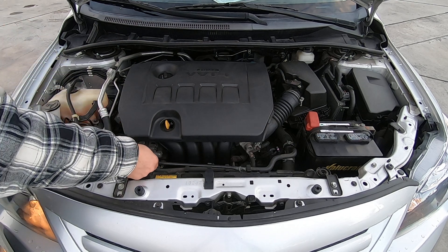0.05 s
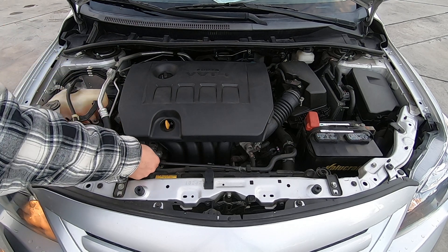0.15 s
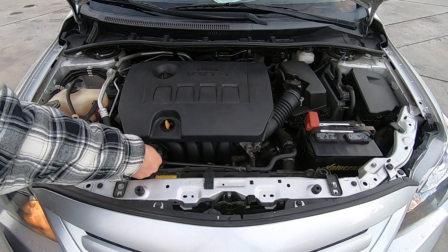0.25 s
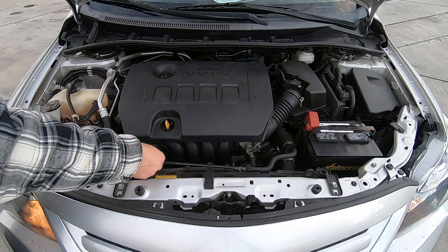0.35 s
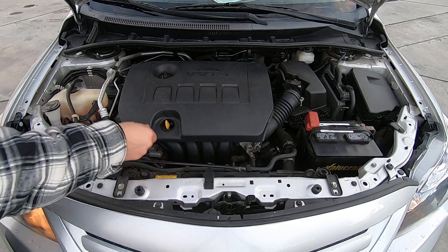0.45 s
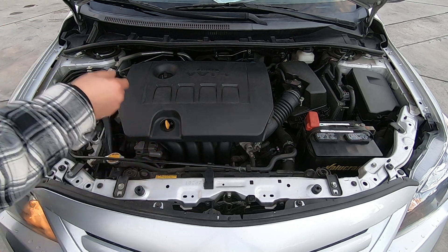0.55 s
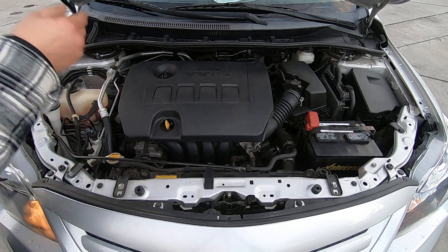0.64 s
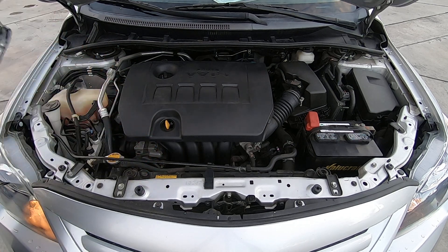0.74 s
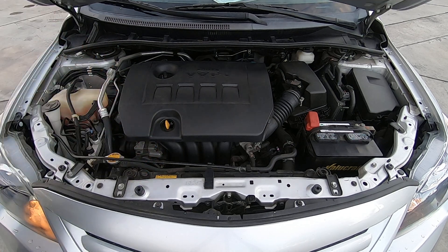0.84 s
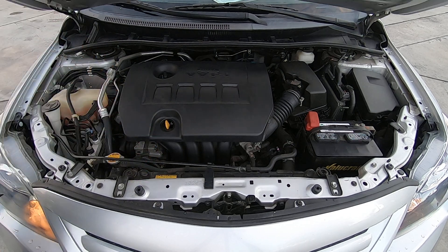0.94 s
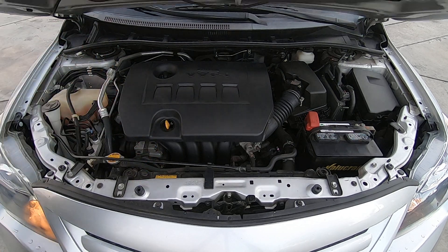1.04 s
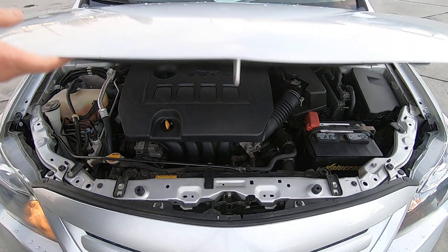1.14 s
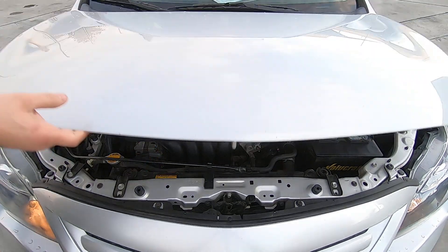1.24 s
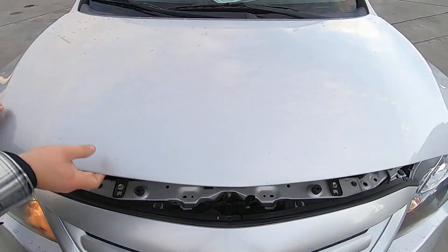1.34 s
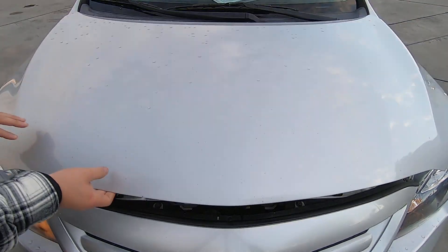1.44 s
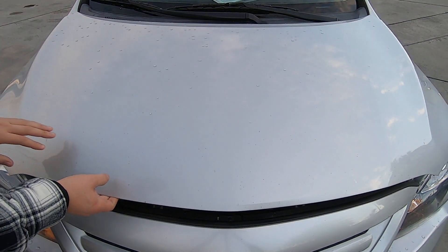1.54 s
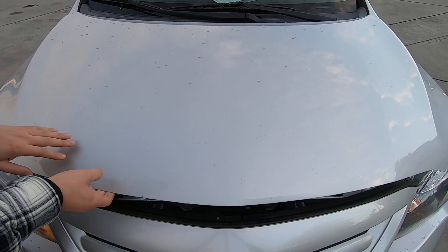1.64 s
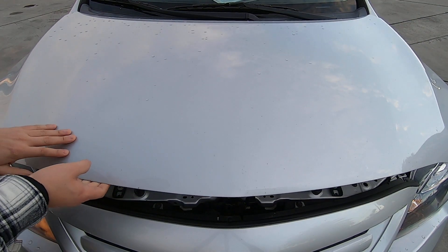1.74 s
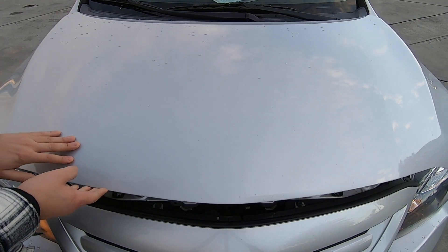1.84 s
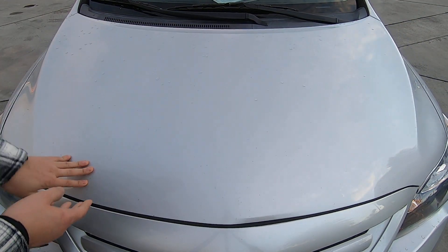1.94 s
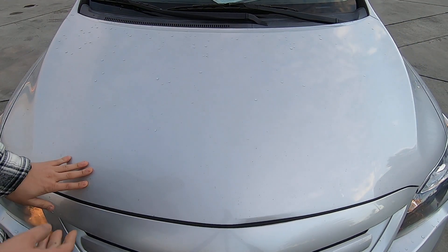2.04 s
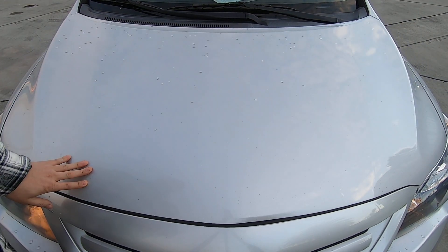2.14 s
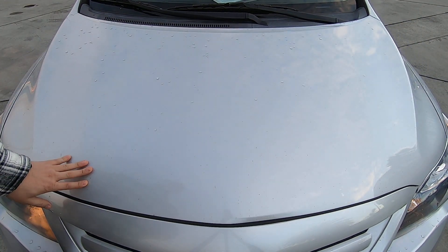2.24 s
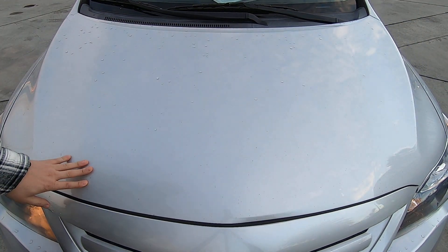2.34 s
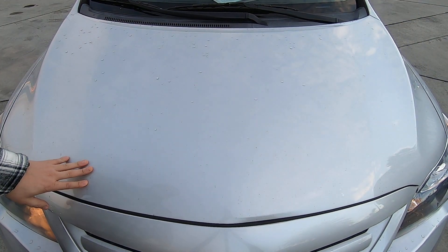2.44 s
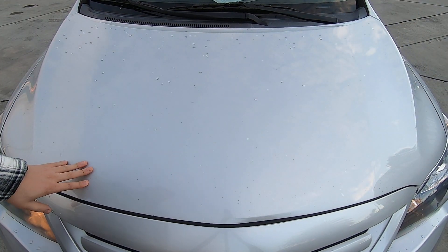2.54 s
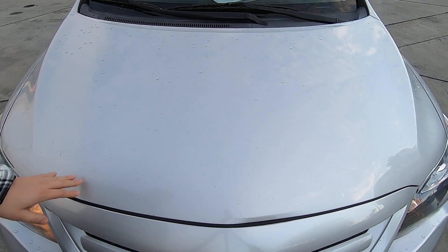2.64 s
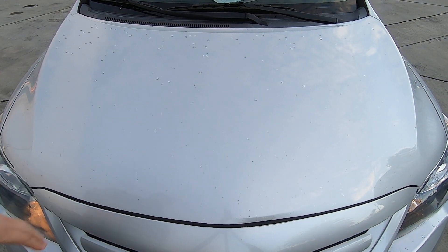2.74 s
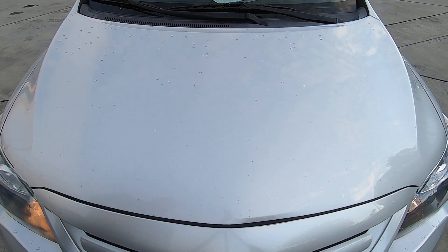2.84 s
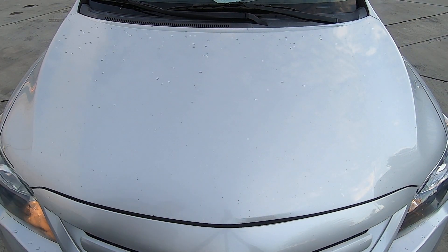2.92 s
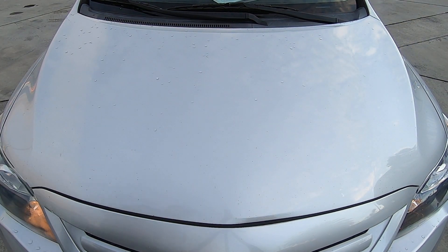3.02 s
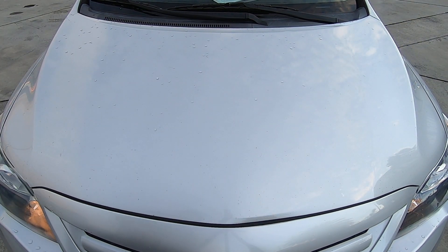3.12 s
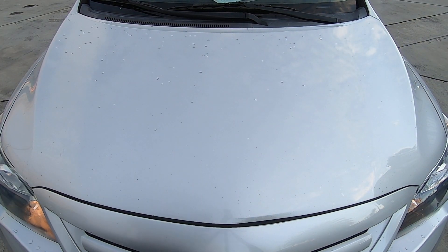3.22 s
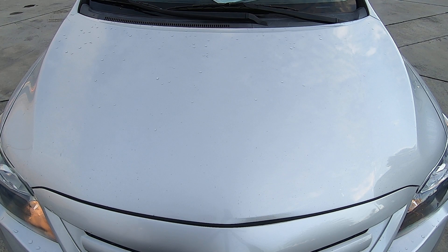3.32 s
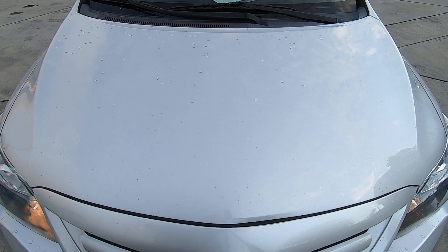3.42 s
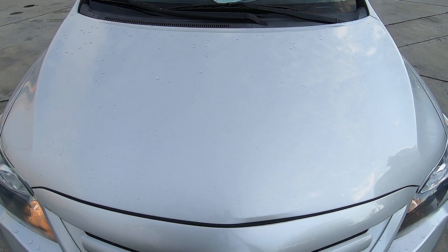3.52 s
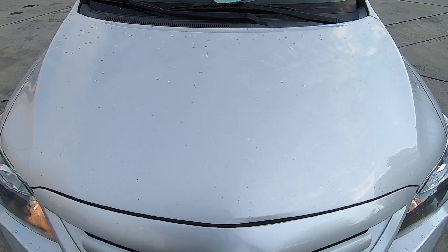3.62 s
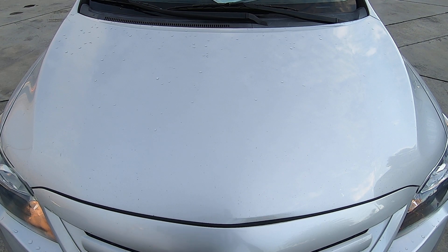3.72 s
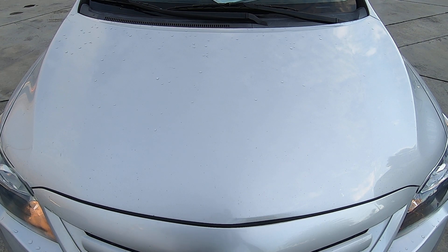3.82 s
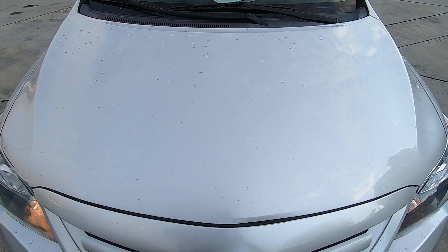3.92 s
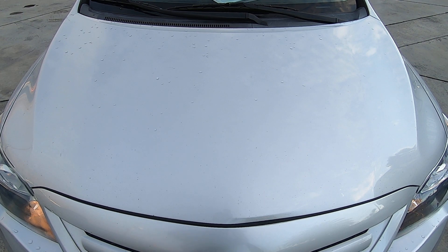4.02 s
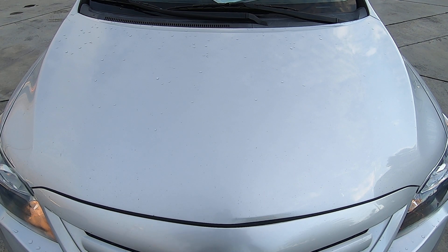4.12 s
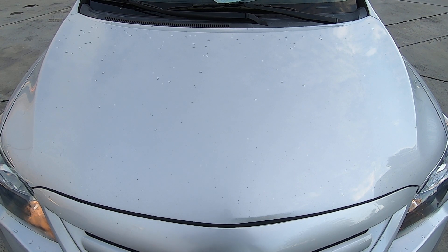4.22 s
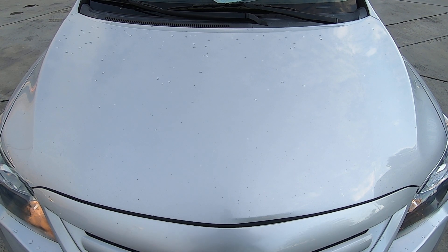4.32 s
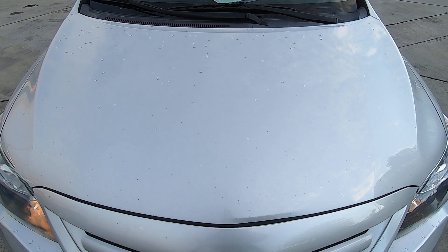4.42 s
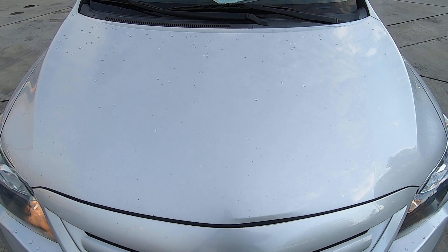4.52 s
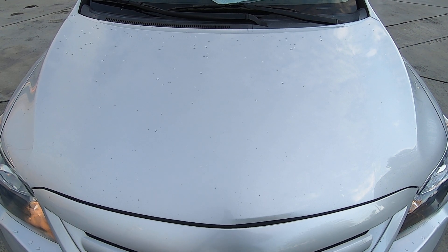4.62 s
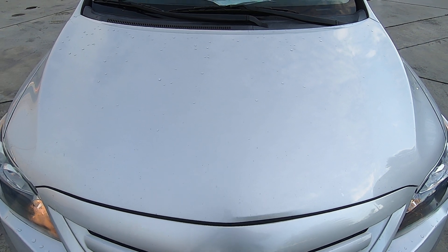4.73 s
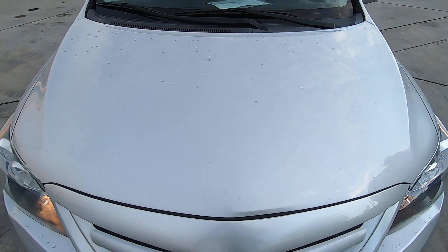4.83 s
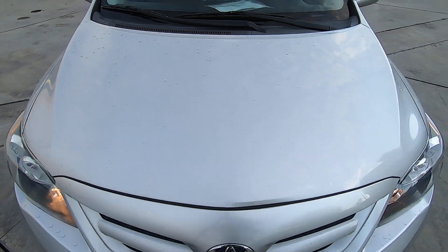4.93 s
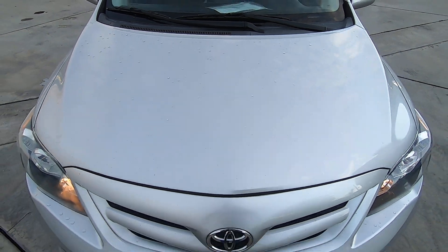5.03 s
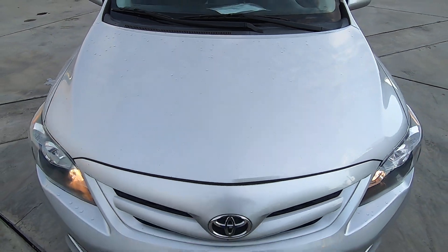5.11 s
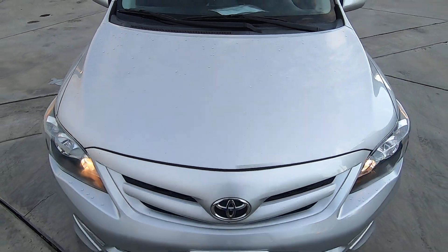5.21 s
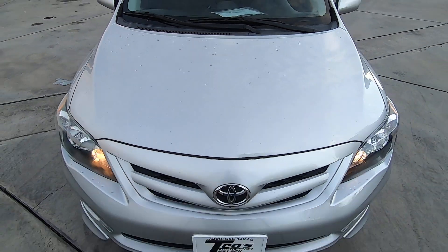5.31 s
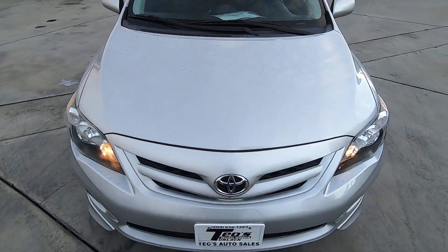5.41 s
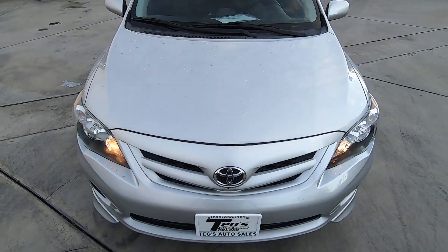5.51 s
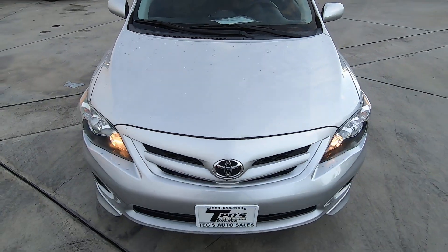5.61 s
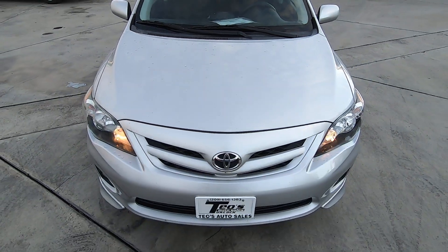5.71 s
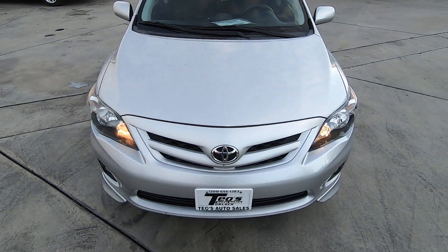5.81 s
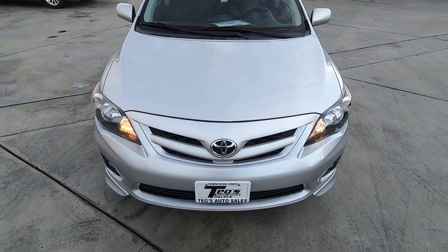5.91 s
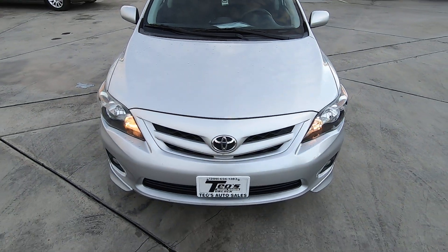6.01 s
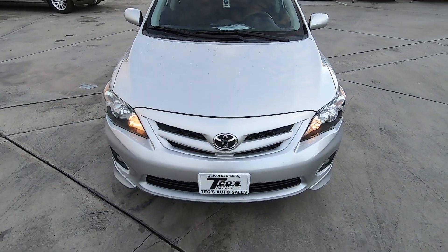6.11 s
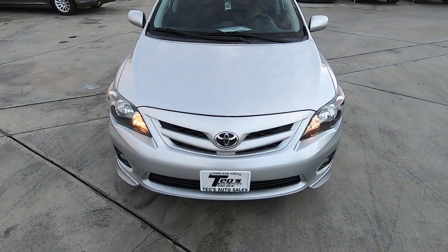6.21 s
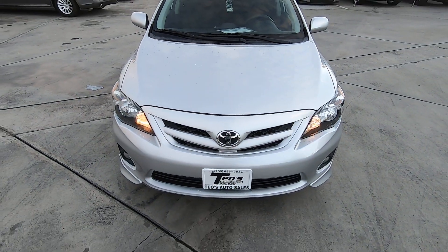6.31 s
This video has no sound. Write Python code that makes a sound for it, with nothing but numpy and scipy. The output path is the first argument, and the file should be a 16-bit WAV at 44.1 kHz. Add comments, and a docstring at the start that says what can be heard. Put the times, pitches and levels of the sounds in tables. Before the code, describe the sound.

A four-cylinder car idles outdoors, the microphone close above the open engine bay: low throbbing hum, rumble, belt whirr, and bright hiss with rapid uneven injector ticks. Almost immediately, at 0.03 seconds, a prop rod snaps into its clip with a hard clack and short metallic ring. Around 1.1 a soft, low bump comes from the hinges. From 1.2 to 1.5 the lowering hood cuts the hiss and ticking. At 2.03 the hood slams: a dense crunch of latch and stops, deep thumps and a booming steel panel, fading within about half a second with a faint spring rattle. The idle is then ducked and muffled, gradually recovering. Faint ticks and light knocks occur near 3.7, 3.8 and 4.8. From 4.75 the microphone backs away with a brief low air buffet; the rumble swells, some hiss returns through the grille, a small knock sounds at 5.3, and the image narrows toward mono until the end, about 6.4.

```python
"""Outdoors, a four-cylinder car idles with its hood up; its firing hum is a sum of sines, its other sounds noise.
The prop rod snaps into its clip: noise bursts and damped modes. The hood is lowered over the ticking injectors
and slammed: latch and stops clash in dense noise, and the modes of the steel panel boom.
The gain ducks and creeps back; later the microphone retreats to the front of the muffled car."""
import sys
import numpy as np
from scipy import signal
from scipy.fft import rfft, irfft, next_fast_len
from scipy.io import wavfile
from scipy.ndimage import uniform_filter1d, minimum_filter1d

SR = 44100
rng = np.random.default_rng(int(sys.argv[2]) if len(sys.argv) > 2 else 0)


def master(y):
    """Save y as 16-bit WAV."""
    cut = np.clip(np.atleast_2d(y).T, -1, 1)
    pcm = np.round(cut * 32767)  # scale
    wavfile.write(sys.argv[1], SR, pcm.astype(np.int16))


N = 280430
TIME = np.arange(N) / SR  # seconds

# Contacts of the falling hood. Each row: start in seconds, clash level in dB, panel level in dB,
# low-pass cutoff of the panel in Hz, rise time in seconds.
SLAM_CONTACTS = [(2.031, -20, -24, 600, 0.00091), (2.0356, -20.5, -12, 700, .0009),
                 (2.044, -14.5, -17, 400, 0.00092), (2.051, -13, -11.5, 700, .0008),
                 (2.0645, -14.5, -9.5, 1100, 0.0014), (2.074, -31, -14.5, 1500, 0.0018),
                 (2.083, -42, -8.5, 2500, 0.0033), (2.094, -43, -10.5, 1500, 0.0014),
                 (2.112, -36, -14, 2000, 0.0034), (2.135, -40, -20, 1500, .003),
                 (2.16, -35, -22, 1000, 0.0067), (2.181, -39, -19.5, 400, 0.0027)]
# Spectra of the dense ring of the sheet steel, of the latch clash and of the bright crack.
# Each row: frequency in Hz, relative density in dB per Hz.
PANEL_SPECTRUM = [(26, -42), (45, -18), (64, -13), (98, -13), (161, -8), (254, -8), (333, -12.5),
                  (490, -10.5), (600, -12), (1000, -22.5), (1670, -31.5), (2300, -40), (2500, -30),
                  (3250, -53), (5500, -120)]
CLASH_SPECTRUM = [(410, -30), (700, -5), (934, -5), (1400, -8.5), (1750, -7.5), (2250, -7), (2660, -9),
                  (3240, -9), (4300, -14), (5260, -15), (5760, -13), (10300, -23.5), (14000, -47),
                  (16000, -45)]
CRACK_SPECTRUM = [(900, -15), (2000, 6.5), (4300, 2.5), (5600, -10), (7000, -7), (10000, -13), (12000, -24),
                  (16000, -28)]
# Decay of the panel and of the clash. Each row: frequency in Hz, time to fall by 60 dB in seconds.
PANEL_DECAY = [(60, 0.69), (200, 0.58), (500, 0.24), (1000, 0.29), (2500, 0.53)]
CLASH_DECAY = [(800, 0.33), (2500, 0.18), (6000, 0.074), (14000, 0.11)]
# Modes of the hood panel, the latch, the safety catch and the rattling latch spring.
# Each row: frequency in Hz, relative level in dB, time to fall by 60 dB in seconds.
PANEL_MODES = [(70.5, 0, .6), (101.3, -9.5, 0.42), (130, -8, .45), (165, 0.5, .6), (202, -2.5, .4),
               (243.6, -0.5, 0.45), (273, -1, 0.44), (306, -7, 0.28), (359, -9, 0.57), (384.6, -7, 0.33),
               (450, -7, 0.33), (485, -4.5, .39), (501, -4.5, 0.26), (637, -9, 0.22), (660, -8.5, .22),
               (742, -10.5, .33), (987, -20, 0.33)]
LATCH_MODES = [(1450, -6, .18), (1579, 0, 0.12), (1760, 6, 0.14), (1912, 1.5, 0.12), (2030, -2, 0.11),
               (2130, -1.5, .18), (2346, -1.5, 0.15), (2498, -5, 0.089), (2880, -3, 0.19), (3190, -2, .18),
               (3310, -3, .14), (3600, -3, 0.14), (3590, 0, .12), (4822, -2, .11), (5688, -1, 0.068),
               (5952, -6, .1), (6330, 0, .08), (6444, -7, .07)]
CATCH_MODES = [(2000, 3.5, .09), (2250, -2, 0.1), (3530, 0, .05), (3730, -2, 0.07), (4120, -15, .04),
               (6160, -11, .03)]
SPRING_MODES = [(2500, -4, .05), (2914, 5, .06), (3180, 0, .06), (3400, -2, .05), (3660, -7, .04),
                (5690, -16, .03)]
# Dull thumps of rubber stops, seal and air squeezed from the bay.
# Each row: start in seconds, frequency in Hz, level in dB, time to fall by 60 dB in seconds.
THUMPS = [(2.033, 240, -5.5, 0.18), (2.044, 125, -1, .09), (2.056, 70, 4, .14), (2.0926, 227, -3, .1),
          (2.177, 158, -9, 0.15)]
# The prop rod meets its clip, seats and bounces. Each row: start in seconds, crack level in dB,
# ring level in dB, low-pass cutoff of the ring in Hz, rise time in seconds.
ROD_HITS = [(0.0292, -14.5, -24.5, 16000, 0.00073), (0.0326, -22, -17.5, 9000, .002),
            (0.0403, -31, -26.5, 6000, .0012), (.0535, -39, -24.5, 1300, .0016),
            (.067, -41, -29, 1300, .0026)]
# Spectrum of the rod's dense ring. Each row: frequency in Hz, relative density in dB per Hz.
ROD_SPECTRUM = [(70, -16), (150, -3), (280, -4), (433, -17), (580, -15), (851, -5), (1020, -19), (1170, -7),
                (1500, -23.5), (1900, -12.5), (2380, -19), (2800, -22), (3900, -21.5), (5480, -27),
                (8150, -29), (14200, -54), (16000, -74)]
# Decay of the rod. Each row: frequency in Hz, time to fall by 60 dB in seconds.
ROD_DECAY = [(200, 0.5), (700, 0.2), (2000, 0.12), (5000, 0.067), (12000, 0.096)]
BRACKET_MODES = [(181, -7, 0.35), (211, 2, 0.31), (251, -1.5, 0.35), (270, 4.5, 0.17), (326, -8, 0.24),
                 (410, -7, 0.22), (480, -7, 0.28), (576, 2.5, .14), (752, -4.5, 0.24), (838, 2, 0.11),
                 (1174, -9, .16), (1796, -13, .2), (2342, -7.5, 0.14), (2450, -11, .1), (3730, -12, 0.099),
                 (4048, -12, .12), (4360, -25, .08)]
# The hood bumps on its hinges; then faint knocks and ticks. Each row: start in seconds, level in dB,
# centre frequency in Hz, time to fall by 60 dB in seconds, rise time in seconds.
KNOCKS = [(1.126, -27, 205, .3, 0.011), (1.126, -26, 350, 0.29, .016), (1.127, -28, 510, .24, 0.011),
          (3.668, -40, 3340, 0.045, .005), (3.668, -48.5, 4100, .05, .005), (3.669, -61, 6500, .06, .007),
          (3.839, -21.5, 736, 0.024, 0.0015), (4.817, -26, 1260, 0.034, 0.0017),
          (5.2915, -23, 720, 0.049, 0.0017)]
# Idle levels with the hood up, ajar and shut, then the gains in front of the car and close over its nose.
# Each row: rumble, whirr and hiss in dB.
UP_DB = (-27.5, -33.5, -45.5)
AJAR_DB = (-29, -34.5, -50)
SHUT_DB = (-30, -34.5, -52.5)
FRONT_GAIN_DB = (5, 3, 5)
NOSE_GAIN_DB = (2.2, 2, 0.1)
# Irregular, mostly brief level fluctuations of the rumbling noise.
# Each row: centre in seconds, peak change in dB, Gaussian width in seconds.
RUMBLE_FLUCTUATIONS = [(.47, 4, .05), (1.575, 3, 0.022), (2.57, -4, 0.065), (3.01, -4, 0.025),
                       (3.63, -0.5, 0.029), (3.99, 5, 0.036), (4.37, 5.5, 0.03), (5.7, 2, 0.35),
                       (6.11, 4.5, 0.036)]
# Harmonics of the steady hum. Each row: multiple of the firing rate, amplitude in dB.
HUM_HARMONICS = [(1, -38.5), (2, -46.5), (3, -40.5), (4, -45), (5, -43.5), (9, -43.5)]
# Ticks within one firing. Each row: share of the firing cycle, strength as a factor.
TICKS = [(-.03, 2.17), (.38, 0.38), (.59, 0.56), (.85, 0.4)]
# Tick strength of the cylinders in turn. Each entry: level in dB.
CYLINDER_DB = [1, -1, 2, -0.5]
# Spectra of the rumble, of the whirr (hood up, round the shut body, through the grille) and of the hiss
# (open bay, through the shut hood, through gap or grille).
# Each row: frequency in Hz, relative density in dB per Hz.
RUMBLE_SPECTRUM = [(12, -28.5), (20, -5.5), (102, 0.5), (161, -7), (211, -7.5), (252, -14.5), (330, -19.5),
                   (430, -36), (730, -120)]
WHIRR_UP = [(150, -22), (250, -3), (365, -2.5), (405, -6), (508, -2.5), (554, -5), (764, -3), (1120, -8),
            (1350, -13.5), (1540, -11), (2400, -26), (3120, -43), (5280, -120)]
WHIRR_SHUT = [(150, -28), (250, -2), (291, -6), (342, 1.5), (397, -5), (528, 1), (1090, -4.5),
              (1700, -12.5), (2400, -22.5), (3120, -52), (5280, -120)]
WHIRR_GRILLE = [(150, -29), (250, -1.5), (308, -6), (437, -5), (499, -6), (597, -2), (864, -4.5),
                (1200, -11.5), (1430, -12), (2100, -22), (2400, -27.5), (3120, -42), (5280, -120)]
HISS_BAY = [(1180, -28), (2000, 1.5), (2220, -3.5), (2670, 0), (4050, -5.5), (4730, -6.5), (6090, -18),
            (7700, -17), (9920, -23), (11500, -32), (14800, -36), (16000, -43)]
HISS_SHUT = [(1180, -20), (2000, -3), (2490, -4), (3170, -5.5), (3840, -13), (5390, -19.5), (6640, -24),
             (9090, -26.5), (11000, -40), (12400, -45.5), (16000, -69)]
HISS_GRILLE = [(1180, -24), (2000, -4.5), (2160, -2), (3090, -0.5), (4490, -12), (5730, -25.5),
               (6530, -25.5), (7640, -24), (9660, -29.5), (11500, -45), (13700, -47), (16000, -74)]
# Spectrum of air buffeting the microphone ports. Each row: frequency in Hz, relative density in dB per Hz.
BUFFET_SPECTRUM = [(25, 3), (90, 0), (190, -5), (300, -8), (700, -24)]
# Source width, before the image as a whole opens and narrows. Each row: frequency in Hz, side minus mid in dB.
WIDTH_NEAR = [(60, -37), (110, -32), (200, -36), (380, -18), (700, -3), (1290, 2.5), (2380, 0.5),
              (4400, -5), (8120, 11.5), (15000, 4)]
WIDTH_FAR = [(60, -22), (110, -32.5), (200, -25.5), (380, -20.5), (700, -7), (1290, -2), (2380, -5.5),
             (4400, -6), (8120, -1.5), (15000, -7)]
WIDTH_SLAM = [(60, -42), (110, -40), (200, -36), (380, -16), (700, -9), (1290, -5), (2380, -8), (4400, -7),
              (8120, 4), (15000, 1)]

# the hood is lowered until it stands ajar; from the first contact of the slam it seals
LOWER_AT_S, LOWER_TAKES_S, SEAL_TAKES_S = 1.23, 0.27, 0.15
# the microphone steps back, passes close over the nose of the car and faces the grille
STEP_BACK_AT_S, STEP_BACK_TAKES_S, GRILLE_IN_VIEW_S = 4.75, 0.9, 0.4
NOSE_AT_S, NOSE_WIDTH_S = 4.86, 0.39
# shares of the hiss (0-1): straight from the bay, then through the gap under the hood or the grille
AJAR_LEAK, SHUT_LEAK = 0.1, 0.014
AJAR_GAP, GRILLE_SHARE = 0.5, 0.92
FIRING_HZ, TICKS_DB = 24.86, 1.5
CATCH_AT_S, CATCH_DB, CRACK_T60_S = 2.032, -20, 0.025
RATTLE_AT_S, RATTLE_DB, RATTLE_T60_S, RATTLE_TAPS_PER_S = 2.11, -36, 0.47, 130
BOOM_AT_S, BOOM_DB, BOOM_RISE_S, BOOM_DRIVEN_S = 2.031, -8.5, 0.041, 0.082
BRACKET_DB = 2  # against the rod's ring
BUFFET_AT_S, BUFFET_DB = 4.76, -41
BUFFET_ATTACK_S, BUFFET_HOLD_S, BUFFET_RELEASE_S = 0.04, 0.2, 0.16
# gain of the side signal as the stereo image opens, then narrows towards mono
NARROW_DB, WIDE_DB, WIDEN_S = -52, 3.5, 0.86
NARROW_AT_S, NARROW_DB_PER_S = 4.91, 50.5
CUTOFF_HZ = 15750


def hood():
    """Impact excitation: the catch trips, contacts clash and shake the panel, and stops and trapped air thump."""
    out = np.zeros((2, N))
    add(out, CATCH_AT_S, from_db(CATCH_DB) * mode_ring(CATCH_MODES, spread_db=2.0))
    for start_s, clash_db, panel_db, bright_hz, rise_s in SLAM_CONTACTS:
        clash = from_db(clash_db) * latch_clash()
        panel_ring = dense_ring(PANEL_SPECTRUM, PANEL_DECAY, WIDTH_SLAM)
        panel = from_db(panel_db) * softened(panel_ring, bright_hz)
        add(out, start_s, rising(rise_s) * (clash + panel))
    add(out, BOOM_AT_S, panel_boom())
    for start_s, hz, db, t60 in THUMPS:
        add(out, start_s, from_db(db) * np.sin(2 * np.pi * hz * TIME[:SR]) * dying(t60))
    add(out, RATTLE_AT_S, spring_rattle())
    return out


def latch_clash():
    """Broadband impact: chattering dense noise, latch modes and a crack, with a faint lingering tail."""
    dense = dense_ring(CLASH_SPECTRUM, CLASH_DECAY, WIDTH_SLAM)
    crunch = from_db(-1.5) * dense * chatter(per_s=500, depth_db=8)
    # the clash lingers in the body and over the concrete
    linger = from_db(-18) * noise(CLASH_SPECTRUM, WIDTH_SLAM, size=SR) * dying(0.4)
    latch = from_db(-4.5) * mode_ring(LATCH_MODES, spread_db=2)
    return crunch + linger + latch + crack()


def panel_boom():
    """Driven resonance: the run of contacts sustains the panel modes, which then decay freely."""
    ring = mode_ring(PANEL_MODES, spread_db=1.0, driven_s=BOOM_DRIVEN_S)
    return from_db(BOOM_DB) * rising(BOOM_RISE_S) * ring


def spring_rattle():
    """Random impulses convolved with modes: the latch spring taps its housing unevenly and dies away."""
    struck = rng.random(SR) < RATTLE_TAPS_PER_S / SR
    taps = struck * rng.choice([-1, 1], SR) * rng.uniform(.4, 1, SR)
    buzz = signal.fftconvolve(taps, mode_ring(SPRING_MODES, spread_db=1))[:SR]
    return from_db(RATTLE_DB) * rms_one(buzz) * dying(RATTLE_T60_S)


def prop_rod():
    out = np.zeros((2, N))
    for start_s, crack_db, ring_db, bright_hz, rise_s in ROD_HITS:
        bracket = from_db(BRACKET_DB) * mode_ring(BRACKET_MODES, spread_db=2.5)
        rod = dense_ring(ROD_SPECTRUM, ROD_DECAY, WIDTH_SLAM)
        body = softened(rod + bracket, bright_hz)
        add(out, start_s, rising(rise_s) * (from_db(crack_db) * crack() + from_db(ring_db) * body))
    return out


def knocks():
    """Band-limited decay: hinge bumps, light knocks and ticks are noise concentrated around one pitch."""
    out = np.zeros((2, N))
    for start_s, db, hz, t60, rise_s in KNOCKS:
        spectrum = [(hz / 2, -22), (hz, 0), (hz * 2, -22)]
        knock = noise(spectrum, WIDTH_FAR, size=SR) * rising(rise_s) * dying(t60)
        add(out, start_s, from_db(db) * knock)
    return out


def engine():
    """Superposition and transmission: hum, rumble, whirr and hiss, reshaped by hood and listening position."""
    lowered, shut = ramp(LOWER_AT_S, LOWER_TAKES_S), ramp(SLAM_CONTACTS[0][0], SEAL_TAKES_S)
    grille, retreat = ramp(STEP_BACK_AT_S, GRILLE_IN_VIEW_S), ramp(STEP_BACK_AT_S, STEP_BACK_TAKES_S)
    ajar = lowered - shut
    hood_db = np.outer(UP_DB, 1 - lowered) + np.outer(AJAR_DB, ajar) + np.outer(SHUT_DB, shut)
    nose_db = np.outer(NOSE_GAIN_DB, bump(NOSE_AT_S, NOSE_WIDTH_S))
    rumble_db, whirr_db, hiss_db = hood_db + np.outer(FRONT_GAIN_DB, retreat) + nose_db
    bay = np.clip(1 - lowered + AJAR_LEAK * ajar + SHUT_LEAK * shut, 0, 1)
    gap = np.clip(AJAR_GAP * ajar + GRILLE_SHARE * grille, 0, 1)
    rumble = from_db(rumble_db + rumble_fluctuation_db()) * noise(RUMBLE_SPECTRUM, WIDTH_FAR)
    whirr = from_db(whirr_db) * belt_whirr(shut, grille)
    hiss = from_db(hiss_db) * valve_hiss(bay, gap)
    return firing_hum() + rumble + whirr + hiss


def firing_hum():
    """Harmonic series: steady sines at whole multiples of the firing rate, in random phase."""
    return sum(from_db(db) * np.sin(2 * np.pi * (round(k) * FIRING_HZ * TIME + rng.random()))
               for k, db in HUM_HARMONICS)


def rumble_fluctuation_db():
    """Amplitude modulation: mostly brief, irregular fluctuations in the level of the rumbling noise."""
    return sum(db * bump(centre_s, width_s) for centre_s, db, width_s in RUMBLE_FLUCTUATIONS)


def belt_whirr(shut, grille):
    """Power-weighted paths: the whirr of belts and fan leaves openly, round the shut body or through the grille."""
    muffled = (np.sqrt(1 - grille) * noise(WHIRR_SHUT, WIDTH_FAR)
               + np.sqrt(grille) * noise(WHIRR_GRILLE, WIDTH_FAR))
    return np.sqrt(1 - shut) * noise(WHIRR_UP, WIDTH_NEAR) + np.sqrt(shut) * muffled


def valve_hiss(bay, gap):
    """Power-weighted paths: valve-gear hiss comes straight from the bay, through gaps or dulled by steel."""
    high_pass = signal.butter(1, 7000, "high", fs=SR, output="sos")
    # the ticks are brighter than the steady hiss and share its direct path
    ticks = ticking(tick_s=0.0059) * signal.sosfilt(high_pass, noise(HISS_BAY, WIDTH_NEAR))
    direct = noise(HISS_BAY, WIDTH_NEAR) + from_db(TICKS_DB) * ticks
    through_steel = np.sqrt(np.maximum(1 - bay - gap, 0)) * noise(HISS_SHUT, WIDTH_FAR)
    return np.sqrt(bay) * direct + np.sqrt(gap) * noise(HISS_GRILLE, WIDTH_FAR) + through_steel


def ticking(tick_s):
    """Periodic impulses through a leaky integrator: injector and valve ticks, of unequal strength by cylinder."""
    clicks = np.zeros(N)
    firing = np.arange(int(N / SR * FIRING_HZ) + 2)
    for share, strength in TICKS:
        at = ((firing + share) / FIRING_HZ * SR).astype(int)
        size = strength * from_db(np.resize(CYLINDER_DB, len(at)))
        inside = (at >= 0) & (at < N)
        clicks[at[inside]] += size[inside]
    return signal.lfilter([1], [1, -np.exp(-1 / (tick_s * SR))], clicks + 1e-18)


def buffeting():
    """Turbulent pressure: low puffs of air, different at each port, buffet the moving microphone."""
    release_at_s = BUFFET_AT_S + BUFFET_ATTACK_S + BUFFET_HOLD_S
    puff = ramp(BUFFET_AT_S, BUFFET_ATTACK_S) - ramp(release_at_s, BUFFET_RELEASE_S)
    return from_db(BUFFET_DB) * puff * noise(BUFFET_SPECTRUM, width=[(25, 4), (700, 2.7)])


def crack():
    """Short impact: a rapidly decaying burst of bright noise as two hard parts meet."""
    return noise(CRACK_SPECTRUM, WIDTH_SLAM, size=SR) * dying(CRACK_T60_S)


def chatter(per_s, depth_db):
    """Intermittent contact: loose steel parts touch and part, giving an uneven gain of rms 1."""
    lumps = np.interp(TIME[:SR] * per_s, np.arange(SR), rng.uniform(-1, 1, SR))
    return rms_one(from_db(depth_db * lumps))


def rising(rise_s):
    """Finite contact time: a padded contact builds up as a squared sine."""
    return np.sin(np.pi / 2 * np.minimum(TIME[:SR] / max(rise_s, 1e-4), 1)) ** 2


def softened(x, bright_hz):
    """Contact stiffness as a low-pass filter: a softer contact wakes fewer high modes."""
    return signal.sosfilt(signal.butter(2, min(bright_hz, .45 * SR), fs=SR, output="sos"), x)


def dense_ring(spectrum, t60s, width):
    """High modal density: noise stands for countless close modes, each octave band with its own decay."""
    start = rfft(noise(spectrum, width, size=SR))
    # one second of sound: the bin number is the frequency in Hz
    octave = np.log2(np.maximum(np.arange(start.shape[1]), 32))
    out = 0
    for k in range(5, 16):
        band = irfft(start * np.maximum(1 - abs(octave - k), 0), SR)
        out = out + band * dying(at_hz(t60s, 2 ** k))
    return out


def mode_ring(modes, spread_db, driven_s=0):
    """Modal synthesis: damped sines of varied strength, each detuned a little by the flexing steel."""
    free_s = np.maximum(TIME[:SR] - driven_s, 0)  # no decay while driven
    out = 0
    for k, (hz, db, t60) in enumerate(modes):
        level_db = db + spread_db * rng.standard_normal() - 60 * free_s / max(t60, .005)
        tone = np.sin(2 * np.pi * hz * rng.normal(1, .0015) * TIME[:SR])
        out = out + (-1) ** k * from_db(level_db) * tone
    return out / np.sqrt(sum(from_db(db) ** 2 for hz, db, t60 in modes) / 2)


def dying(t60):
    """Exponential damping: one second of an envelope that falls by 60 dB in t60 seconds."""
    return np.exp(-np.log(1000) * TIME[:SR] / max(t60, .005))


def noise(spectrum, width, size=N):
    """Spectral shaping: stereo noise of a given colour and width, whose middle has rms 1."""
    padded = next_fast_len(size)
    hz = np.fft.rfftfreq(padded, 1 / SR)
    # a steep fall beyond both ends of the table
    outside = np.maximum(spectrum[0][0] / np.maximum(hz, 1), hz / spectrum[-1][0])
    colour = from_db(at_hz(spectrum, hz)) / np.maximum(outside, 1) ** 10
    mid, side = colour * rfft(rng.standard_normal((2, padded)))
    side = side * from_db(at_hz(width, hz))
    out = irfft(np.array([mid + side, mid - side]), padded)[:, :size]
    return out / np.std(out.mean(axis=0))


def at_hz(points, hz):
    """Logarithmic pitch scale: a table is interpolated along log frequency."""
    known_hz, values = np.transpose(points)
    return np.interp(np.log(np.maximum(hz, 1)), np.log(known_hz), values)


def from_db(db):
    """Decibel law: 20 dB is a factor of ten in amplitude."""
    return np.exp(np.log(10) * np.asarray(db) / 20)


def rms_one(x):
    """Power normalisation: the signal is scaled to rms 1."""
    return x / np.sqrt(np.mean(x ** 2) + 1e-20)


def ramp(start_s, length_s):
    """Uniform motion: a movement's progress from 0 to 1."""
    return np.clip((TIME - start_s) / max(length_s, .001), 0, 1)


def bump(centre_s, width_s):
    """Gaussian envelope: a smooth rise and fall around one moment, with height 1."""
    return np.exp(-.5 * ((TIME - centre_s) / width_s) ** 2)


def add(track, start_s, sound):
    """Linear superposition: a sound is added to the track at its time."""
    i = max(round(start_s * SR), 0)
    track[:, i:i + sound.shape[-1]] += sound[..., :N - i]


def scene():
    """Mid-side superposition: all sources, in an image that opens gradually and later narrows towards mono."""
    left, right = hood() + prop_rod() + knocks() + engine() + buffeting()
    opening_db = WIDE_DB + (NARROW_DB - WIDE_DB) * np.exp(-TIME / WIDEN_S)
    side_db = opening_db - NARROW_DB_PER_S * np.maximum(TIME - NARROW_AT_S, 0)
    mid, side = (left + right) / 2, from_db(side_db) * (left - right) / 2
    return np.array([mid + side, mid - side])


def gain_control(x, limit_db, hold_s, release_db_per_s):
    """Dynamic compression: gain drops quickly when the level passes the limit, holds, then creeps back."""
    power = uniform_filter1d(np.mean(x ** 2, axis=0), size=882)  # 20 ms
    over_db = np.maximum(10 * np.log10(np.maximum(power, 1e-12)) - limit_db, 0)
    half = int(hold_s * SR / 2)
    # the largest recent excess is held
    held_db = -minimum_filter1d(-over_db, 2 * half + 1, origin=half, mode="nearest")
    # then the cut shrinks at a constant rate
    cut_db = np.maximum.accumulate(held_db + release_db_per_s * TIME) - release_db_per_s * TIME
    return x * from_db(-uniform_filter1d(cut_db, size=88))


def record(dry):
    """Nonlinear and band-limited transmission: gain control, a soft start, rounded peaks and a steep top cut."""
    levelled = gain_control(dry, limit_db=-9.5, hold_s=0.53, release_db_per_s=8.0)
    rounded = ramp(0, .001) * 1.2 * np.tanh(levelled / 1.2)
    return signal.sosfilt(signal.ellip(10, .1, 80, CUTOFF_HZ, fs=SR, output="sos"), rounded)


dry = scene()
out = record(dry)
master(out)
```